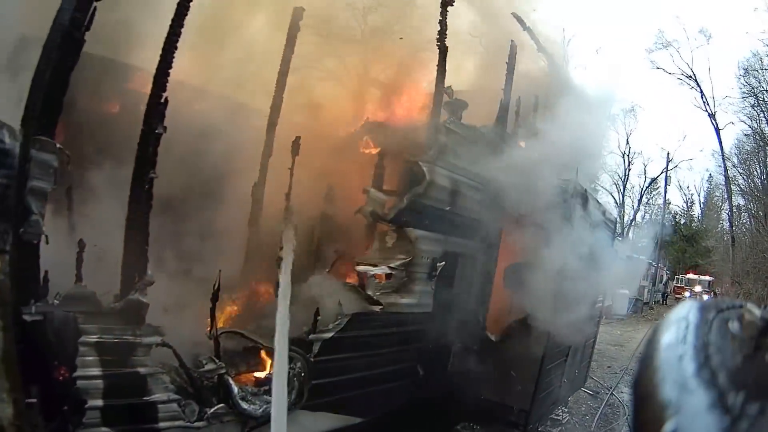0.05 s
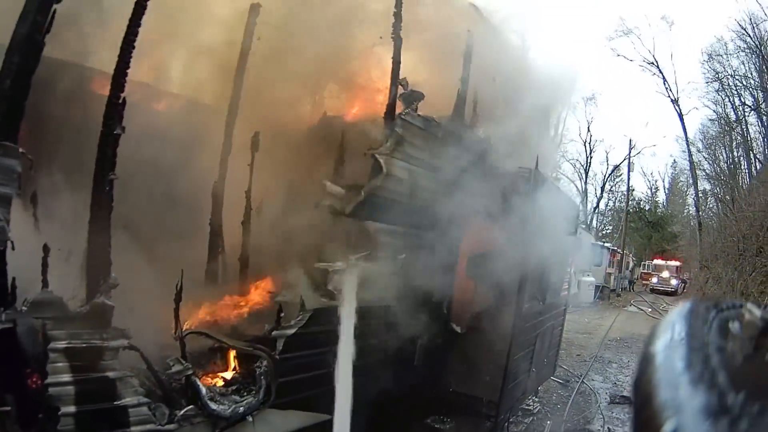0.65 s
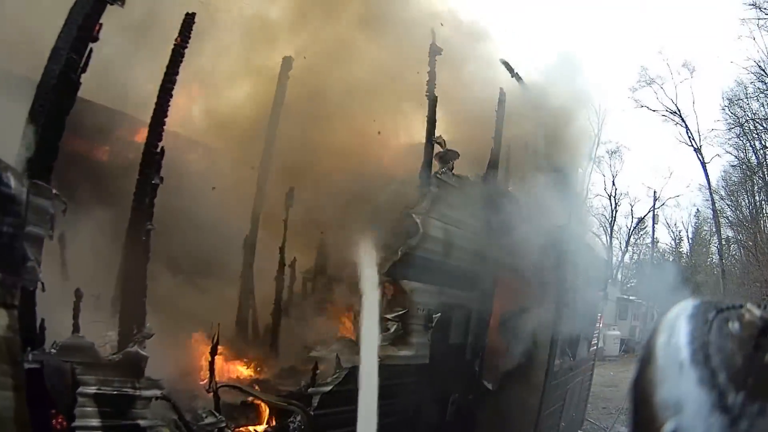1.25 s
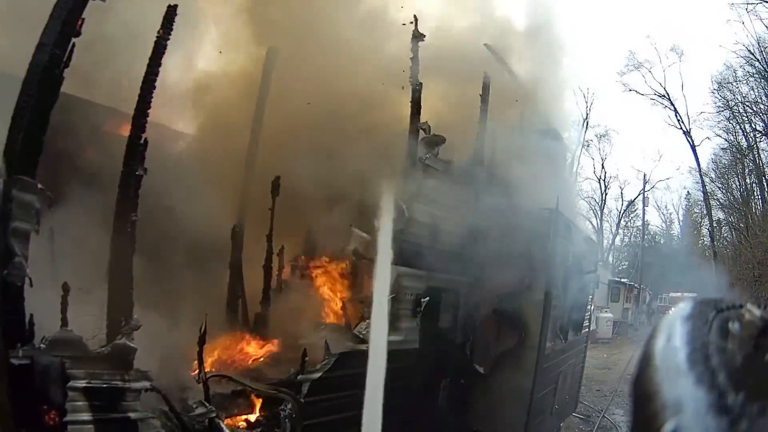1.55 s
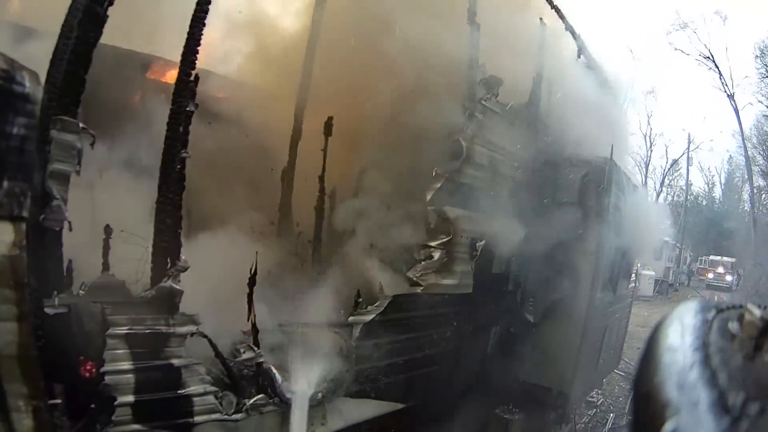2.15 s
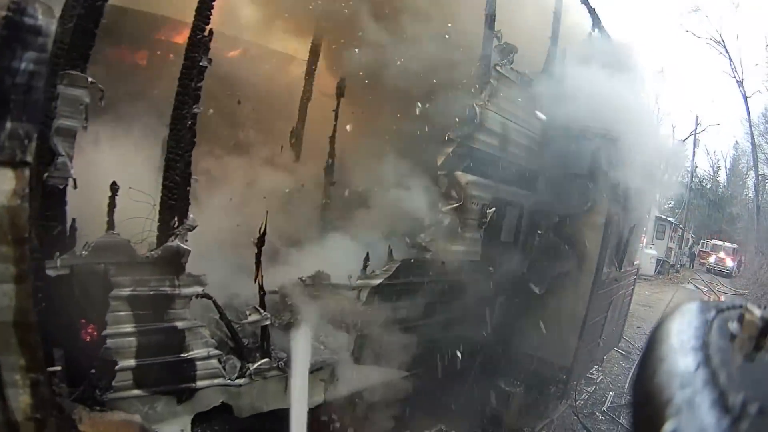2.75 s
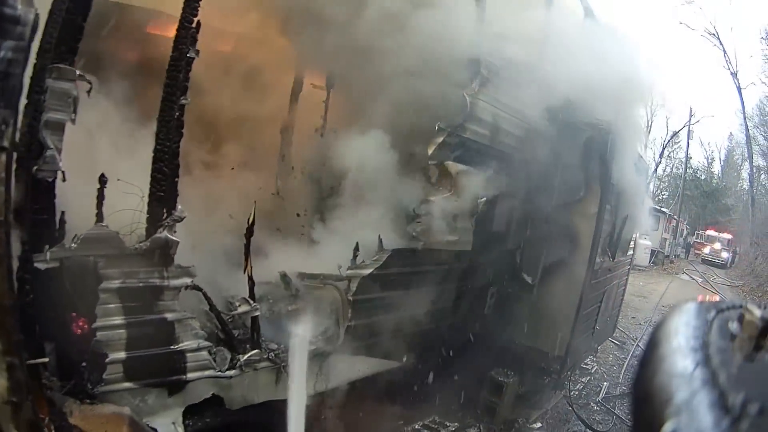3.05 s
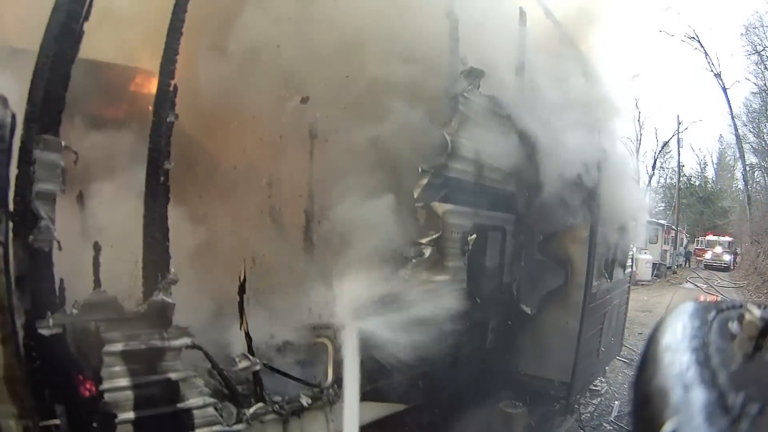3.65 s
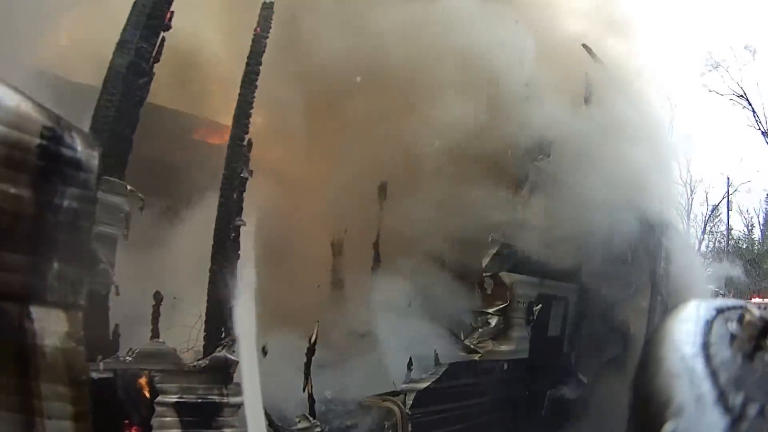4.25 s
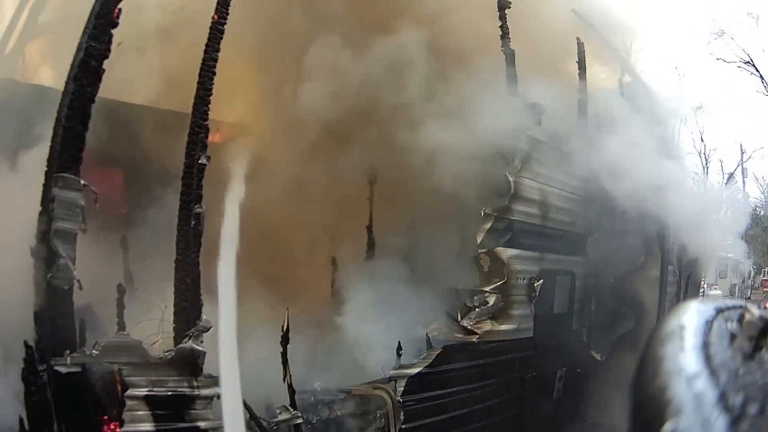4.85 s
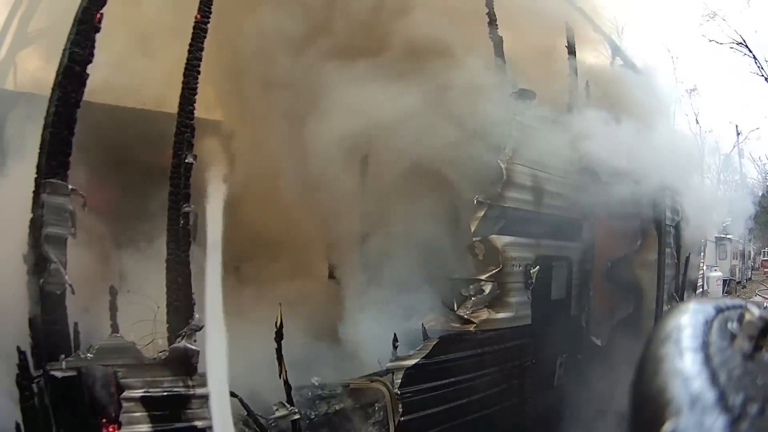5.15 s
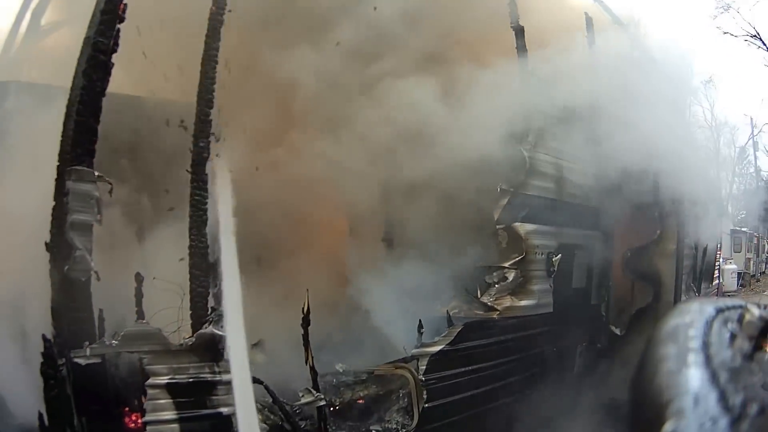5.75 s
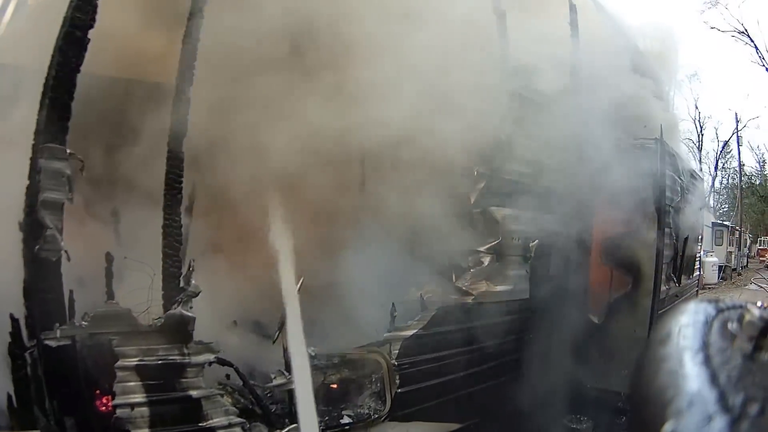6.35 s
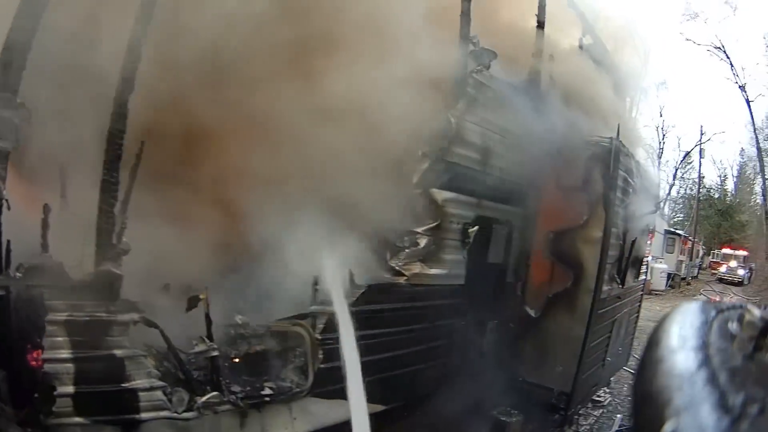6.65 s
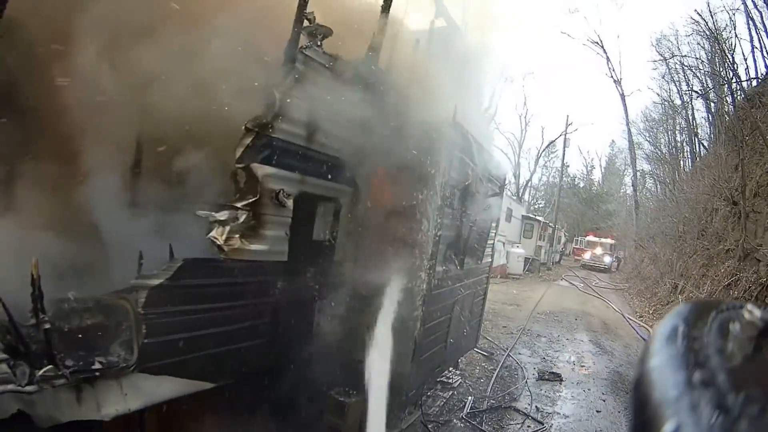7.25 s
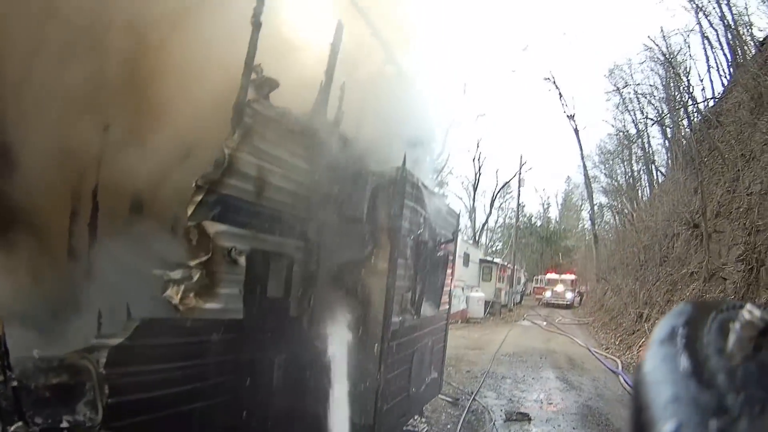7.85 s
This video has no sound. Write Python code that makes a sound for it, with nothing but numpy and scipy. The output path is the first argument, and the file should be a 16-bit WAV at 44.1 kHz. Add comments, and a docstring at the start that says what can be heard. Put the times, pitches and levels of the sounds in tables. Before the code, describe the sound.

A fire hose sprays a burning mobile home outdoors. The water splatters and hisses in uneven surges and drums hollowly on sheet siding, with scattered slaps and ticks. About a third of the way in, one heavy debris thump briefly overloads the microphone. The spray carries on and drums hardest near the end. Fire rumbles low underneath, and everything sounds close and boxy through a waterproof case.

```python
"""A fire hose sprays a burning mobile home, heard from inside a camera's waterproof case close by.
The jet breaks into lumps and drops that splatter and hiss on the wreck and drum on its sheet siding,
swelling and easing as the stream sweeps about. Debris knocks, and one heavy thump overloads the
microphone. Behind it all, the fire rumbles and fine mist hisses at the nozzle."""
import sys
import numpy as np
from scipy import signal
from scipy.fft import rfft, irfft
from scipy.io import wavfile

SR = 44100
rng = np.random.default_rng(int(sys.argv[2]) if len(sys.argv) > 2 else 0)


def transcribe(signal):
    """Save signal, clipped to [-1, 1], as a 16-bit WAV file at the path in sys.argv[1]."""
    frames = np.atleast_2d(signal).T
    limited = np.clip(frames, -1, 1)
    pcm = np.round(limited * 32767).astype(np.int16)
    wavfile.write(sys.argv[1], SR, pcm)


N = 352359
TIME = np.arange(N) / SR

# The tone of water hitting the wreck. Each row: frequency in Hz, relative level in dB.
WATER_HIT_TONE = [(150, -17), (700, -1), (1400, 3), (3500, -0.5), (12000, -6.5)]


def water():
    """The jet lands in lumps; each lump splatters, throws spray and drums on the siding at once."""
    # The tones of those three sounds. Each row: frequency in Hz, relative level in dB.
    splatter_tone = [(200, -28.5), (600, -12.5), (850, -2.5), (1200, 0), (2200, 0.5), (3000, -2.5),
                     (4500, -4), (15000, -36)]
    spray_tone = [(700, -24), (1500, -28), (2300, -5), (3000, 1), (6000, -1), (10000, 1.5), (15000, 6)]
    drum_tone = [(40, -21), (110, -10), (200, 0.5), (550, -1.5), (850, -4), (1200, -8.5), (2500, -32.5)]
    splatter_gain, spray_gain, drum_gain, hardness_db = sweeping_jet()
    lumps = wander(low_hz=2.9, high_hz=45)
    splatter = with_tone(drops(per_second=1800, spread_db=3.0, mist_db=0), splatter_tone)
    splatter = brighten(splatter, hardness_db, pivot_hz=1390)  # harder pieces sound brighter
    splatter = flutter(splatter, lumps, depth_db=1.0)
    spray = with_tone(drops(per_second=3500, spread_db=3.5, mist_db=-2.5), spray_tone)
    spray = flutter(spray, lumps, depth_db=0.84)
    drum = with_tone(drops(per_second=700, spread_db=2.5, mist_db=1.5), drum_tone)
    drum = flutter(drum, lumps, depth_db=1.14)
    # A square hit moves the whole panel, so loud drumming sounds deeper.
    extra_db = np.maximum(20 * np.log10(drum_gain) + 28, 0)
    drum = brighten(drum, -0.45 * extra_db, pivot_hz=410)
    return splatter * splatter_gain + spray * spray_gain + drum * drum_gain


def sweeping_jet():
    """The moving stream sets the gains of splatter, spray and drumming, and the hardness it meets."""
    # The steady wash over the wreck. Each row: time in seconds, splatter in dB, spray in dB.
    wash = [(0, -37.5, -49), (.24, -47, -51.5), (.72, -44.5, -51), (1.0, -35, -38.5), (1.35, -47.5, -54),
            (1.74, -43, -48), (1.95, -34.5, -44.5), (2.6, -25.5, -36), (2.98, -38.5, -49), (3.3, -32, -41),
            (3.66, -35, -46), (3.98, -28.5, -36.5), (4.24, -42, -50.5), (4.37, -48, -55.5),
            (4.66, -38, -42.5), (5.3, -35.5, -44), (6.95, -34, -44), (7.99, -36.5, -39.5)]
    # The jet catches one piece, then slips off. Each row: start and end in seconds, then in dB:
    # splatter, spray, drumming, middle above the ends, end above the start, hardness of the piece.
    surges = [(0.076, 0.158, -38, -36.5, -41, 10, 4, -10), (0.167, 0.19, -41, -44.5, -47, 0, 0, -1),
              (0.273, 0.409, -37, -43, -48, 3.5, 0.5, -2), (0.494, 0.527, -37, -44.5, -55, -0.5, -4, -2),
              (0.572, 0.66, -37.5, -42.5, -47, 2, -6, -4), (.738, 0.845, -28, -38, -35.5, 1.5, -2, -5),
              (0.836, 1.137, -23.5, -35, -25, 3.5, 0.5, -5.5),
              (1.148, 1.288, -29, -39, -35.5, 1.5, -9.5, -6),
              (1.459, 1.685, -35, -43.5, -41, 2.5, -0.5, -1.5),
              (1.775, 1.982, -31.5, -38.5, -42.5, -0.5, -1, 3.5),
              (1.982, 2.048, -26, -34.5, -33.5, 2, 9, -2), (2.088, 2.24, -28, -35, -34.5, -0.5, 2, -1),
              (2.294, 2.562, -27, -53, -30.5, 6, -7, -9), (2.59, 2.804, -35.5, -37, -39.5, 2.5, 10, 2),
              (2.867, 2.957, -36, -45.5, -39, -0.5, -8, -5), (3.028, 3.173, -33, -42, -41, -2.5, 2, 3),
              (3.252, 3.601, -37.5, -42, -42, -3, 8.5, -2), (3.714, 3.782, -32, -39.5, -38, -1, -5, 4),
              (3.85, 3.91, -29.5, -34, -37, 5.5, 0, 13), (3.93, 4.114, -23, -36.5, -33, 1.5, -1.5, -3),
              (4.183, 4.21, -27, -34, -41, 1.5, -4, -6), (4.27, 4.299, -28.5, -36.5, -45, 1.5, 0, -12),
              (4.381, 4.436, -39, -43, -43, 6, -4, -7), (4.422, 4.523, -27, -37, -35.5, 3.5, 1, -3),
              (4.51, 4.61, -31.5, -44, -40, 0, 1.5, 1), (4.656, 5.088, -26.5, -44, -33.5, 3, 4, 1),
              (5.116, 5.17, -33, -49, -36.5, 0.5, 1, -1), (5.383, 5.607, -25, -44, -37, 6.5, 8.5, -5.5),
              (5.752, 6.021, -27.5, -38, -45, 4.5, 4, -1.5), (6.085, 6.144, -34.5, -44, -58, 3, 3, -2),
              (6.29, 6.37, -35, -49, -51, 4, 1, 7), (6.388, 6.583, -34.5, -64, -43, 2.5, -5, 12),
              (6.712, 6.823, -27.5, -47, -39, 4, 4, -7.5), (6.868, 6.956, -29, -38.5, -36.5, 2, 3, 4.5),
              (6.962, 7.321, -23.5, -34, -27.5, 3, 2, -7), (7.377, 7.585, -22, -34, -21.5, -0.5, -1, -7),
              (7.795, 7.986, -24.5, -48, -23.5, 6.5, 4, -9.5)]
    times, *wash_levels = np.transpose(wash)
    splatter_db, spray_db = (np.interp(TIME, times, level) for level in wash_levels)
    drum_db = -23.5 + 0.52 * splatter_db  # the wash drums faintly, growing with its splatter
    power = gain_of([splatter_db, spray_db, drum_db]) ** 2
    hardness_sum = -3 * power[0]  # the wash meets a hardness of -3 dB
    for start, end, *levels_db, arch_db, swell_db, hardness_db in surges:
        surge = gain_of(levels_db)[:, None] ** 2 * surge_power(end - start, arch_db, swell_db)
        for total, part in zip(power, surge):
            add(total, start, part)
        add(hardness_sum, start, hardness_db * surge[0])
    average_hardness_db = hardness_sum / power[0]  # the loudest splatter counts most
    return *np.sqrt(power), average_hardness_db


def surge_power(seconds, arch_db, swell_db, catch_s=0.019, slip_db_per_s=467):
    """A surge rises as the jet catches a piece, holds, and dies quickly once the jet slips off."""
    seconds = max(seconds, catch_s)
    t = TIME[:round(seconds * SR) + SR // 5]
    along = np.minimum(t / seconds, 1) * 2 - 1  # -1 at the start, 1 at the end
    hold_db = swell_db * along / 2 - arch_db * abs(along) ** 0.88  # an arch with a pointed middle
    rise = np.minimum(t / catch_s, 1)
    fall = gain_of(-slip_db_per_s * np.maximum(t - seconds, 0))
    follows = [1, 0.74, 1.53]  # how strongly splatter, spray and drumming follow the arch
    return (rise * fall * gain_of(np.outer(follows, hold_db))) ** 2


def humming_panels():
    """Each panel hums at its own note, which wavers under the shifting load of water."""
    # The jet stays on a panel. Each row: start and end in seconds, pitch and waver in Hz, level in dB.
    hums = [(.93, 1.105, 234, 19, -33.5), (4.52, 4.797, 179.4, 29, -40.5), (4.76, 5.03, 194, 8, -35.5),
            (7.04, 7.286, 199.2, 15.3, -26.5), (7.374, 7.46, 282.3, 47, -21.5),
            (7.473, 7.607, 305, 11, -20.5), (7.484, 7.597, 370.4, 28, -20), (7.858, 8.05, 249, 8.2, -30.5)]
    out = np.zeros(N)
    for start, end, hz, waver_hz, db in hums:
        count = round((end - start) * SR)
        pitch = hz + waver_hz / 2 * wander(low_hz=1.8, high_hz=25)[:count]
        note = np.sin(2 * np.pi * (np.cumsum(pitch) / SR + rng.random()))
        add(out, start, gain_of(db) * unit_level(note) * signal.windows.tukey(count, 0.6))
    return out


def water_slaps():
    """Big lumps of water slap the wreck."""
    # Each row: start in seconds, level in dB, seconds to fade by 60 dB.
    slaps = [(.108, -27.5, 0.16), (.498, -33, .1), (.736, -31, .2), (.975, -16.5, 0.11),
             (1.035, -16.5, 0.11), (1.195, -19.5, 0.075), (1.270, -27, .07), (1.465, -40, 0.12),
             (1.548, -25, .07), (1.658, -23, 0.063), (3.606, -27, .05), (3.868, -25, 0.09),
             (4.045, -17.5, 0.12), (4.289, -24.5, 0.055), (4.439, -23.5, 0.31), (4.654, -30, .07),
             (5.552, -19, 0.044), (6.440, -33, .07), (6.545, -23.5, 0.053), (6.575, -29, 0.054),
             (7.125, -12, 0.066), (7.385, -25, 0.57), (7.884, -20, 0.095)]
    return bursts(slaps, WATER_HIT_TONE, rise_s=0.0019)


def fat_drops():
    """Single fat drops smack close by; each is one click that rings the case."""
    # Each row: start in seconds, peak level in dB.
    smacks = [(.4645, -32), (2.058, -17), (3.761, -17), (4.8505, -15), (4.873, -16), (4.973, -17),
              (5.0725, -13), (5.8625, -17), (5.938, -16), (6.440, -13), (6.5775, -18), (7.806, -26)]
    out = np.zeros(N)
    ring = with_tone(signal.unit_impulse(SR // 20), WATER_HIT_TONE)
    for start, db in smacks:
        add(out, start, gain_of(db) * ring / abs(ring).max())
    return out


def bright_ticks():
    """Short, bright ticks and cracks: a sharp splash, small impacts and the crack of the big thump."""
    # Each row: start in seconds, level in dB, seconds to fade by 60 dB.
    ticks = [(1.277, -26.5, 0.047), (2.579, -18.5, .03), (2.609, -8, 0.014), (2.627, -19, 0.012),
             (2.765, -17.5, 0.019), (3.704, -16, 0.031), (4.972, -25, 0.026), (7.084, -21.5, .05)]
    # The tone of a tick. Each row: frequency in Hz, relative level in dB.
    tick_tone = [(300, -7), (1500, -2), (3200, 12.5), (6000, 3), (12000, -9)]
    return bursts(ticks, tick_tone, rise_s=0.00065)


def debris_thumps():
    """Heavy pieces thump with a few fast-dying swings; the siding clatters after the biggest thump."""
    # Each row: start in seconds, level in dB, pitch in Hz, seconds to fade by 60 dB.
    thumps = [(2.6085, 11.5, 345, .0185), (2.6268, -2, 560, .009), (3.611, -19, 300, .035)]
    # The tone of shaken siding. Each row: frequency in Hz, relative level in dB.
    clatter_tone = [(30, -6), (90, 0), (250, -4), (500, -0.5), (850, 0), (1200, -2.5), (1700, -16),
                    (3000, -35)]
    out, t = np.zeros(N), TIME[:SR // 10]
    for start, db, hz, fade_s in thumps:
        add(out, start, -gain_of(db - 60 * t / fade_s) * np.sin(2 * np.pi * hz * t))
    clatter_start_s, clatter_db, clatter_fade_s = 2.616, -13.5, 0.34
    return out + bursts([(clatter_start_s, clatter_db, clatter_fade_s)], clatter_tone, rise_s=0.0019)


def fire_rumble():
    """The fire and the stirred air make a deep noise that slowly swells and eases."""
    # The tone of the rumble. Each row: frequency in Hz, relative level in dB.
    rumble_tone = [(10, -28), (28, -4.5), (55, -2), (90, -3.5), (150, -2.5), (300, -9), (700, -44.5),
                   (2000, -49), (12000, -75)]
    # Its loudness. Each row: time in seconds, level in dB.
    swells = [(0, -44), (.45, -44.5), (1, -40.5), (1.55, -45.5), (2, -42.5), (2.35, -35), (2.7, -40),
              (2.95, -40), (3.95, -39.5), (4.4, -41), (5.6, -46), (6.6, -45), (7, -36.5), (7.25, -43),
              (7.5, -38), (7.7, -38), (7.92, -34)]
    rumble = with_tone(rng.standard_normal(N), rumble_tone, through_case=False)
    return rumble * gain_of(np.interp(TIME, *np.transpose(swells)))


def nozzle_mist(level_db=-66):
    """Fine mist around the nozzle gives a faint hiss that never lets up."""
    # The tone of the hiss. Each row: frequency in Hz, relative level in dB.
    mist_tone = [(2000, -35), (6000, -12), (10000, 4), (15000, 5)]
    return gain_of(level_db) * with_tone(rng.standard_normal(N), mist_tone)


def case_gain(hz):
    """The closed case lets some frequencies through to the microphone better than others."""
    # Where the case rings. Each row: frequency in Hz, width in Hz, level in dB.
    rings = [(219, 377, -3.5), (446, 344, -7.5), (1199, 486, -8.5), (1450, 340, -1), (1700, 604, -2.5),
             (2080, 930, -10.5), (3130, 410, -15.5), (3438, 300, -14), (3724, 330, -15), (5030, 660, -28.5),
             (5630, 520, -26.5), (6600, 730, -30), (7380, 880, -29), (8440, 1040, -34.5), (10020, 810, -40),
             (11400, 350, -45.5), (12500, 990, -53), (15500, 850, -53)]
    # Narrow bands it muffles. Each row: frequency in Hz, width in Hz, change in dB.
    dips = [(827, 180, -5), (2745, 110, -4), (6100, 220, -5)]

    def bump(centre, width):
        return 1 / (1 + (2 * (hz - centre) / width) ** 2)

    ring_power = sum((gain_of(db) * bump(centre, width)) ** 2 for centre, width, db in rings)
    dip_db = sum(db * bump(centre, width) for centre, width, db in dips)
    return np.sqrt(ring_power) * gain_of(dip_db)


def drops(per_second, spread_db, mist_db):
    """Separate drops of uneven size land among countless tiny ones."""
    size = gain_of(spread_db * np.minimum(rng.exponential(1, N), 4.5))
    hits = size * rng.choice([-1, 1], N) * (rng.random(N) < per_second / SR)
    return unit_level(unit_level(hits) + gain_of(mist_db) * rng.standard_normal(N))


def bursts(rows, tone, rise_s):
    """Short showers of impacts, made from noise, start sharply and die away."""
    loudness, t = np.zeros(N), TIME[:SR // 2]
    shower = with_tone(rng.standard_normal(N), tone)
    for start, db, fade_s in rows:
        add(loudness, start, gain_of(db - 60 * t / fade_s) * (1 - np.exp(-t / rise_s)))
    return loudness * shower


def with_tone(sound, tone, through_case=True):
    """Shapes a sound with a tone table and, if asked, the case; its level comes out as 1."""
    hz = np.fft.rfftfreq(8192, 1 / SR)
    tone_hz, tone_db = np.transpose(tone)
    gain = gain_of(np.interp(np.log(hz + 1), np.log(tone_hz), tone_db))
    if through_case:
        gain *= case_gain(hz)
    # Build a filter that rings only after each hit, never before it.
    log_gain = np.log(np.r_[gain, gain[-2:0:-1]] + 1e-6)
    spectrum = np.exp(np.conj(signal.hilbert(log_gain)))
    ring = np.fft.ifft(spectrum).real[:len(hz)]
    return unit_level(signal.oaconvolve(sound, ring)[:len(sound)])


def brighten(sound, tilt_db, pivot_hz):
    """Turns the highs up and the lows down; a negative tilt does the opposite."""
    lows = signal.sosfiltfilt(signal.butter(4, pivot_hz, fs=SR, output="sos"), sound)
    return lows * gain_of(-tilt_db / 2) + (sound - lows) * gain_of(tilt_db / 2)


def flutter(sound, lumps, depth_db):
    """Makes the loudness flutter with the lumps while the overall level stays at 1."""
    return unit_level(sound * gain_of(depth_db * lumps))


def wander(low_hz, high_hz):
    """A random wobble, mostly between two rates."""
    hz = np.fft.rfftfreq(N, 1 / SR)
    cut_slow = hz ** 2 / (hz ** 2 + low_hz ** 2)
    cut_fast = 1 / np.sqrt(1 + (hz / high_hz) ** 2) / (1 + (hz / (10 * high_hz)) ** 2)
    return unit_level(irfft(rfft(rng.standard_normal(N)) * cut_slow * cut_fast, N))


def gain_of(db):
    """Turns decibels into a number to multiply by."""
    return 10 ** (np.asarray(db) / 20)


def unit_level(sound):
    """Scales a sound so that its average (root mean square) level is 1."""
    return sound / np.sqrt(np.mean(sound ** 2) + 1e-20)


def add(mix, start_s, sound):
    """Mixes a sound in at its start time."""
    part = mix[round(start_s * SR):][:len(sound)]
    part += sound[:len(part)]


def scene():
    """Water, debris and fire, mixed into one channel."""
    hits = water_slaps() + bright_ticks()
    hose = water() + humming_panels() + fat_drops()
    return (hose + hits + debris_thumps() + fire_rumble() + nozzle_mist())[None]


def record(dry):
    """The overloaded microphone flattens the big thump's peaks; then the highest treble is cut."""
    ceiling, top_hz = 0.67, 15750
    flattened = np.clip(dry, -ceiling, ceiling)
    treble_cut = signal.firwin(511, top_hz, window=("kaiser", 9), fs=SR)
    return signal.oaconvolve(flattened, treble_cut[None], "same")


dry = scene()
out = record(dry)
transcribe(out)
```